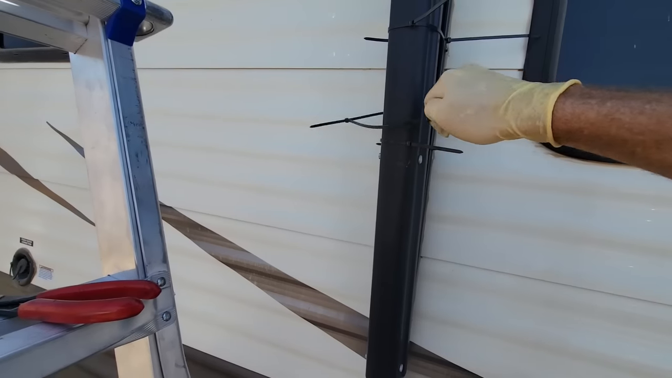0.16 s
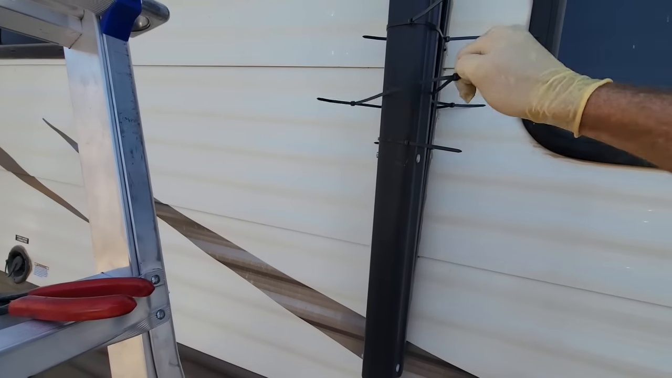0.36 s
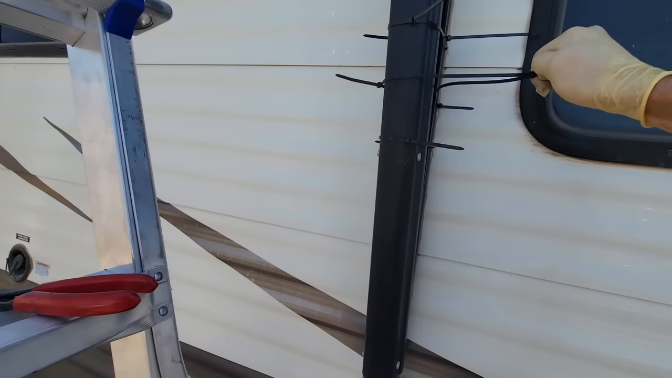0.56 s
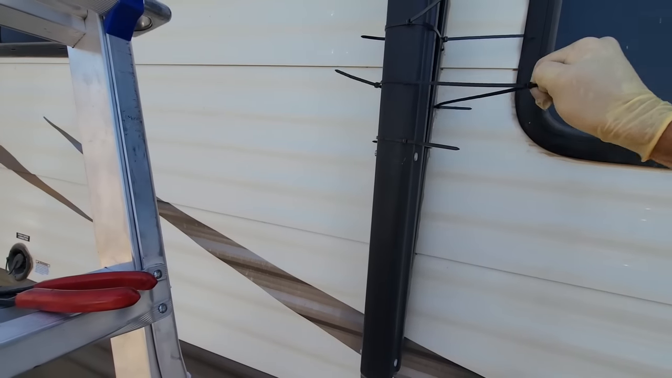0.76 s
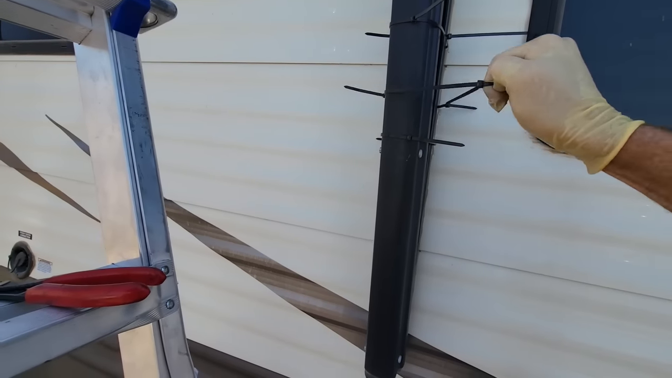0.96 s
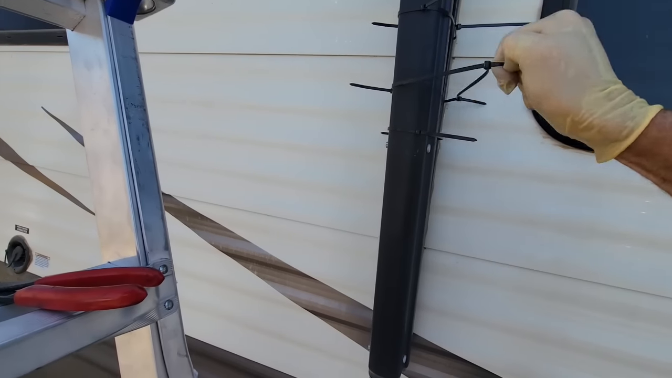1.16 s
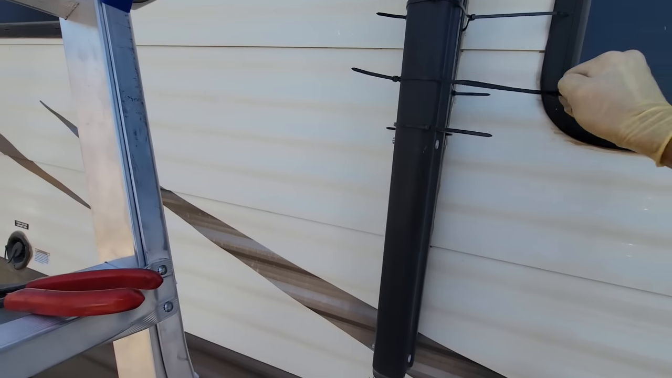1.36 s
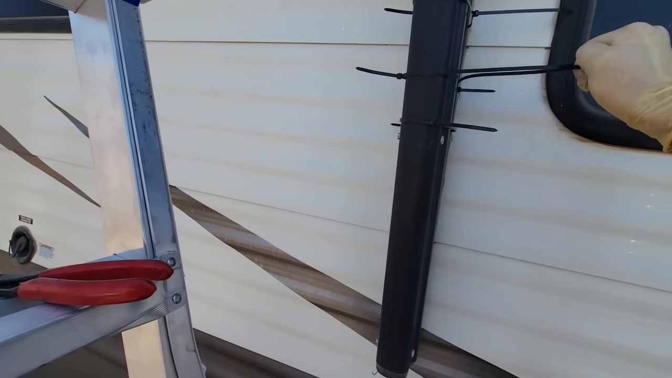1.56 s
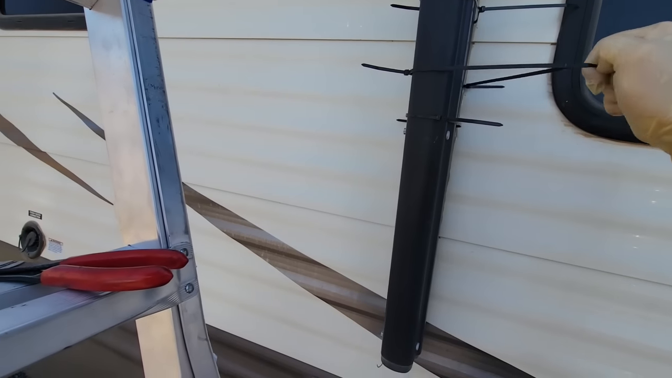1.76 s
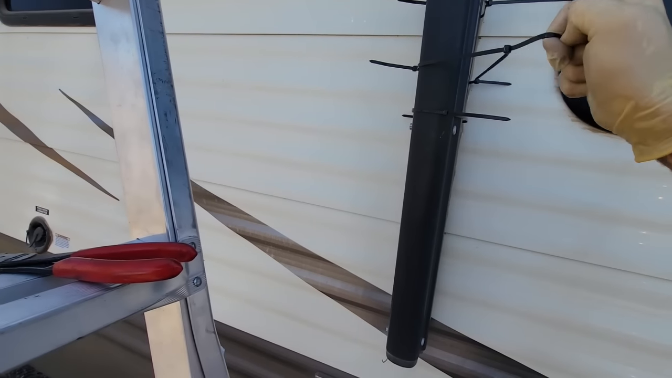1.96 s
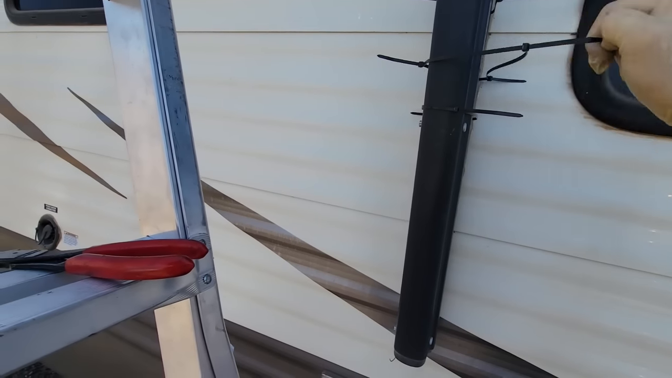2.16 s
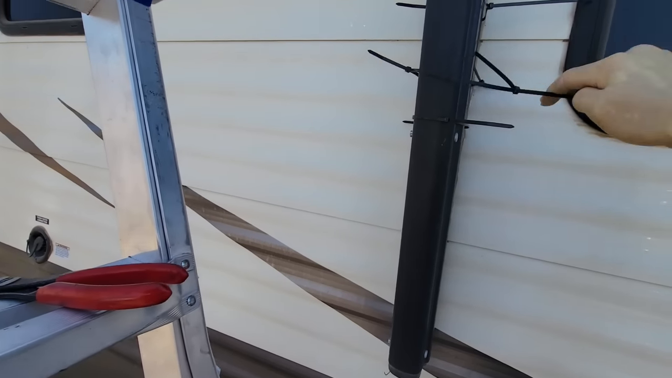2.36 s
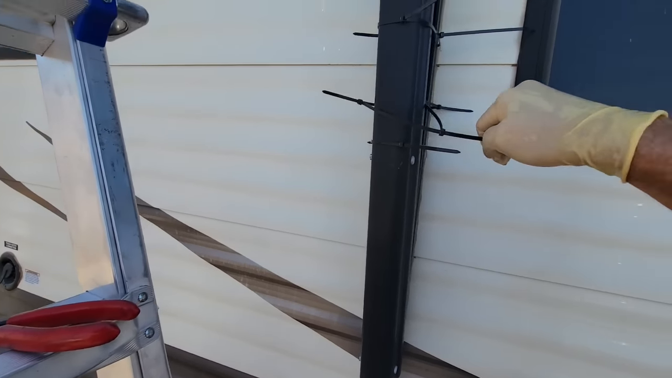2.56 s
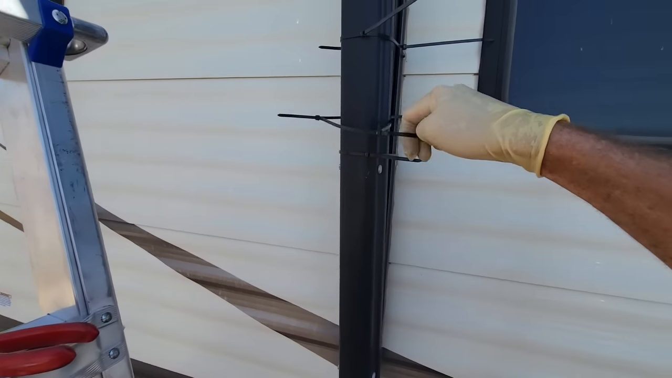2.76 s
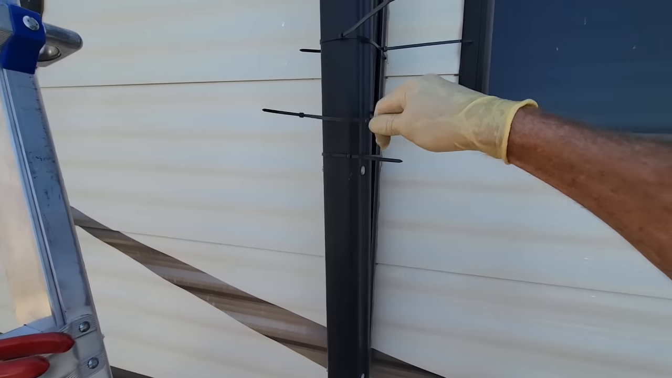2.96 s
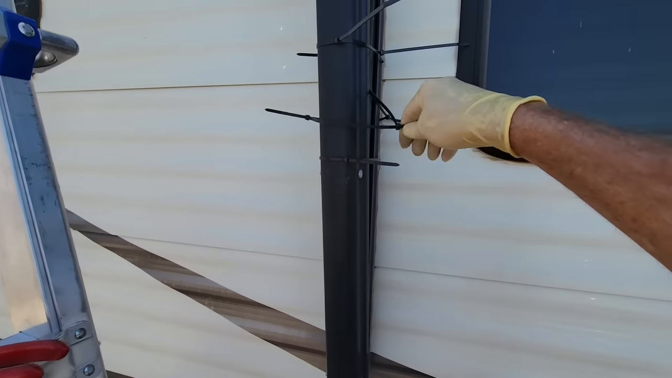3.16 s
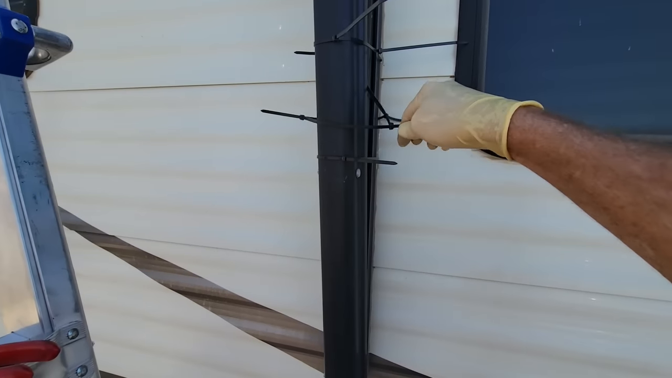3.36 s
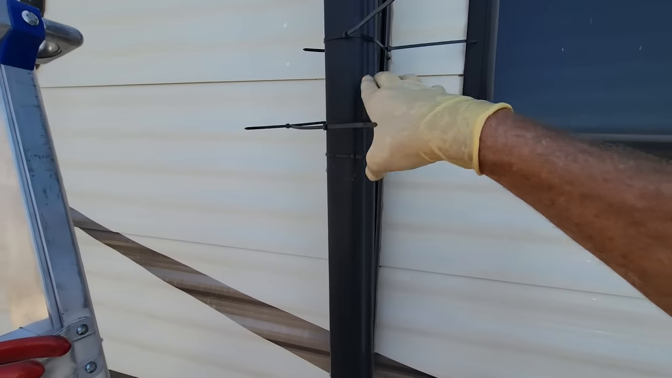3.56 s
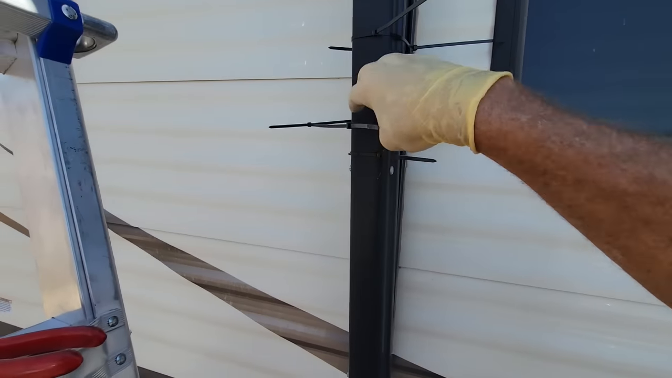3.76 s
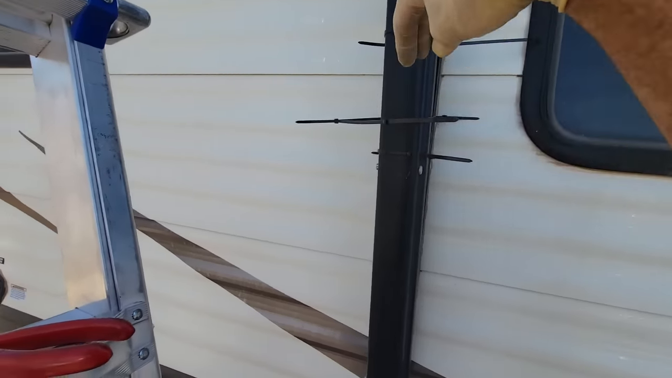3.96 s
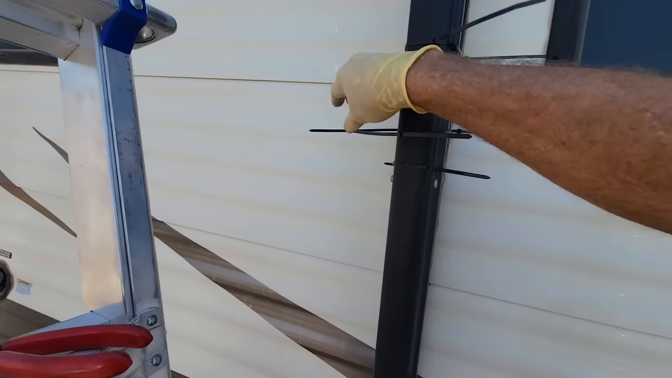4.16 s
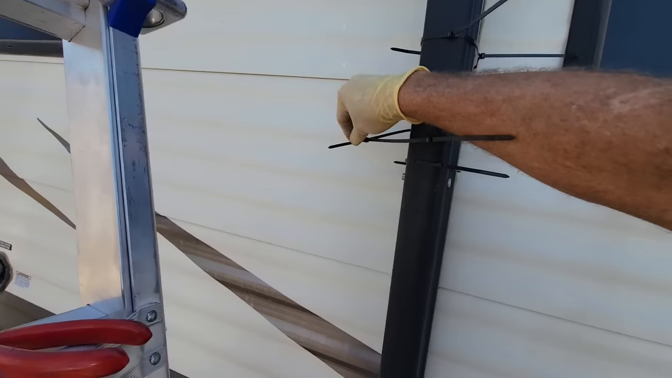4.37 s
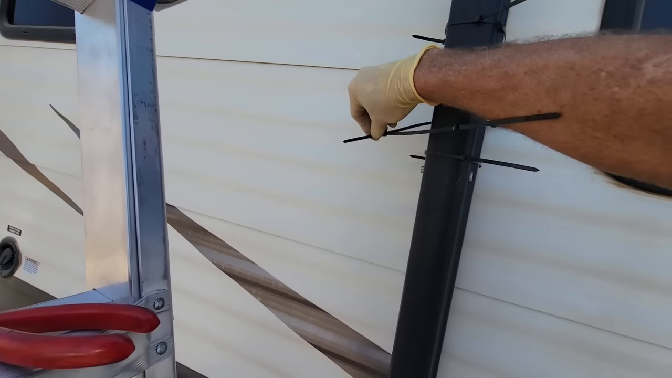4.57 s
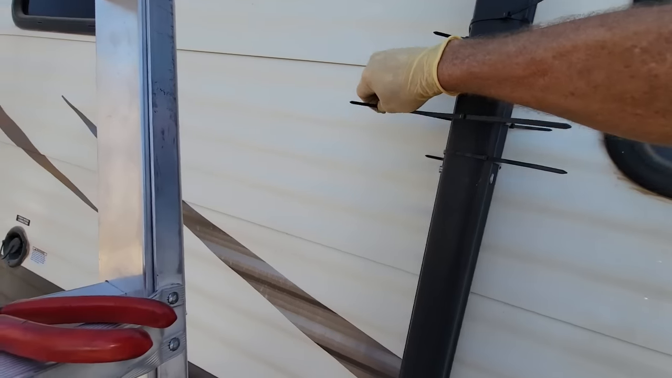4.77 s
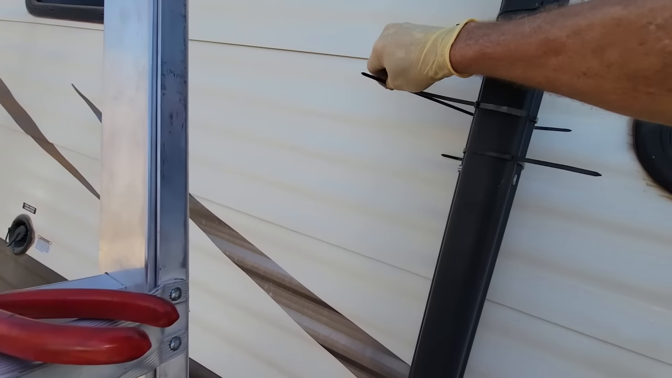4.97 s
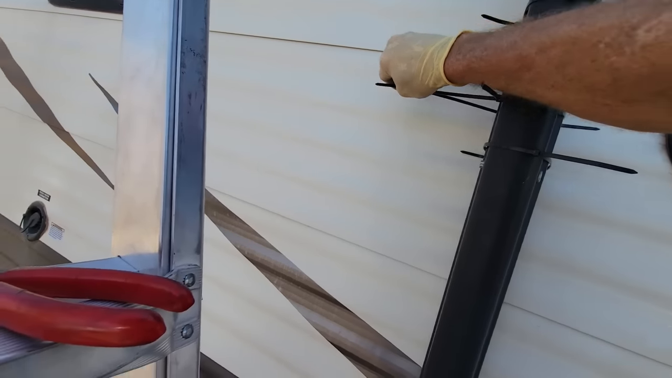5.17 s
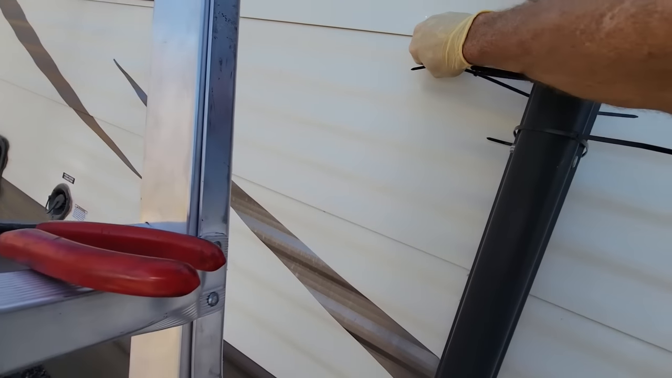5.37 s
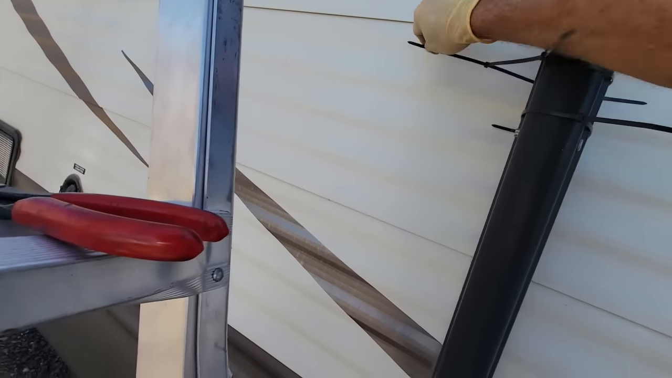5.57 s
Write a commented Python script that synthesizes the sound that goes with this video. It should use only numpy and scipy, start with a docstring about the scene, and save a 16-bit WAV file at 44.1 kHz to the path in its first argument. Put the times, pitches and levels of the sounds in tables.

```python
"""Outdoors, at a bar in front of a thin wall panel, on a stereo pair of microphones.
A gloved hand pulls nylon zip ties tight round the bar: glove and straps rub, the squeezed bar creaks,
and the pawl snaps over the teeth, singly and in two long runs, setting strap, bar and panel ringing.
Wind rumbles on the microphones over a distant hiss; far off, a small bird calls high and faint."""
import sys
import numpy as np
from scipy import signal
from scipy.fft import rfft, irfft, next_fast_len
from scipy.io import wavfile
from scipy.ndimage import uniform_filter1d

SR = 44100
rng = np.random.default_rng(int(sys.argv[2]) if len(sys.argv) > 2 else 0)


def generate_wav(signal):
    """Clip the signal to [-1, 1] and save it as 16-bit WAV at the path in sys.argv[1]."""
    frames = np.transpose(np.atleast_2d(signal))
    scaled = np.clip(frames, -1, 1) * 32767
    pcm = np.round(scaled).astype(np.int16)
    wavfile.write(sys.argv[1], SR, pcm)


N = 247821

# likeness of the two microphones: (frequency [Hz], likeness [0-1])
MIC_LIKENESS = [(60, 0.95), (150, 1), (500, 0.66), (1000, 0.59), (3000, 0.89), (6000, 0), (16000, 0.2)]
# phase of the left microphone ahead of the right: (frequency [Hz], phase [rad])
MIC_PHASE = [(0, 0), (300, -.35), (520, -1.4), (1500, -1.6), (2800, -1.9), (5000, -2.5), (6550, -14),
             (8350, -16), (10500, -16.5), (12100, -7.5), (14400, -12.5), (16700, -16.0)]
# left microphone over the right, before panning: (frequency [Hz], level [dB])
MIC_TILT = [(100, 0.5), (380, 4), (700, 1), (1300, 4), (2400, 5), (15000, 4)]
# lower edges of the panel, bar, strap and pawl bands: (frequency [Hz])
BAND_EDGES = [70, 450, 1500, 7000]
# spectrum of a click's dense ring: (frequency [Hz], level [dB])
RING_COLOUR = [(59, -50), (100, -25), (165, -21), (243, -4), (300, 0), (400, -9), (542, -3.5), (793, -7.5),
               (1090, -7.5), (1890, -19), (2640, -15), (3480, -14.5), (4390, -21.5), (8630, -24),
               (11000, -24), (13000, -17), (15600, -11)]
# decay of that ring: (frequency [Hz], t60 [s])
RING_DECAY = [(150, 0.27), (500, 0.093), (1200, 0.14), (3000, 0.15), (6000, 0.12), (10000, 0.14),
              (16000, 0.028)]
# modes of bar and panel: (frequency [Hz], level [dB], t60 [s])
BODY_MODES = [(110.6, -19, 0.2), (301, -5, 0.2), (360.4, -14.5, 0.27), (542.6, -8, 0.11), (700, -7, 0.13),
              (786, -22, 0.23), (921, -10.5, 0.12), (1100, -16, 0.13), (1370, -23, 0.28), (1659, -19, 0.12),
              (2010, -26, 0.2), (2330, -15, 0.086), (2650, -15.5, 0.059), (3125, -18.5, 0.17),
              (3520, -18, 0.06), (4333, -19.5, .1)]
# murmur as the hand shifts its hold: (time [s], panel level [dB])
HOLD_MURMUR = [(0.0, -70), (.45, -47.5), (1.2, -67), (1.74, -51), (1.87, -61), (2.05, -54.5), (2.4, -65.5),
               (2.8, -74.5), (3.2, -54.5), (3.45, -67), (3.85, -63), (4.1, -68), (4.6, -66.5), (5.15, -53),
               (5.3, -64.5), (5.62, -60.5)]
# strokes of glove and strap: (peak time [s], rise [s], fall [s], strap level [dB],
# panel over strap [dB], bar over strap [dB], top band over strap [dB])
GLOVE_STROKES = [(0.0, 0.049, 0.065, -45, -3, -43, -6), (0.178, 0.22, 0.013, -46.5, 6.5, 0.5, -4),
                 (.29, .03, 0.0087, -63, 11, 15, -24), (0.54, 0.058, 0.023, -46, 6, 10.5, -15),
                 (0.801, 0.047, .1, -67, 29, 23.5, -19), (.928, 0.12, 0.085, -50, -1, -18, -1.5),
                 (0.99, .1, 0.0093, -46.5, 17.5, 8.5, -23), (1.118, .03, 0.017, -57.5, 6, 14.5, -28),
                 (1.34, 0.29, 0.15, -56.5, 12, 8, -18), (1.64, 0.063, 0.078, -59, 14, 15, -26),
                 (1.687, 0.036, 0.017, -49, -4, -2, -8), (1.888, 0.016, 0.1, -51, -8, 2.5, -7),
                 (1.981, .1, 0.04, -54, -9, -10, -9), (2.243, 0.49, 0.15, -58, -19, -28, -6),
                 (2.43, 0.16, 0.037, -60.5, -8, -6, -16), (2.574, 0.13, 0.26, -65.5, -5, 0.5, -5),
                 (2.78, 0.3, 0.35, -62, 3, -1, -6), (2.93, 0.021, 0.15, -63.5, -12, 3.5, -25),
                 (3.087, 0.049, 0.04, -47, -15, -19, 2), (3.238, 0.097, .065, -49, 2.5, 1.5, -20),
                 (3.342, .03, 0.11, -69, 1, 1, -19), (3.63, 0.22, .02, -69, -6, -9, -20),
                 (3.72, 0.065, 0.08, -42, -6, 3, -12), (4.482, 0.069, 0.11, -63, 10, 9.5, -6),
                 (4.722, 0.076, 0.12, -58, -2, -2, 1), (5.2, .05, 0.047, -56.5, 14.5, 4.5, -3),
                 (5.401, 0.23, 0.025, -69, -5, 10, 0), (5.482, 0.031, 0.16, -66, -3, -9, -17)]
# gusts on the microphones: (time [s], level [dB])
GUSTS = [(0.0, -59), (0.33, -50), (0.59, -58), (0.66, -42), (0.7, -57), (1.53, -49.5), (1.58, -38),
         (1.67, -62), (1.74, -45.5), (2.14, -42.5), (2.21, -33), (2.28, -48), (2.38, -39), (2.43, -52),
         (2.55, -39.5), (2.63, -49.5), (3.74, -55.5), (3.94, -47.5), (4.04, -54.5), (5.62, -51)]
# spectrum of the wind: (frequency [Hz], level [dB])
RUMBLE_COLOUR = [(12, -37), (20, -9.5), (54, 2), (69, 7.5), (115, -8), (166, -63), (250, -10), (280, -27),
                 (300, -28), (390, -79), (660, -120)]
# spectrum of the distant hiss: (frequency [Hz], level [dB])
HISS_COLOUR = [(59, -14.5), (100, 3), (156, -5.5), (288, -17.5), (326, -5), (468, -30), (554, -10.5),
               (629, -17.5), (1020, -22), (1630, -30), (15600, -45)]
# creaks of the bar: (time [s], length [s], pitch [Hz], level [dB])
BAR_CREAKS = [(0.105, 0.076, 345, -45), (0.511, 0.072, 329, -36), (0.801, 0.042, 394, -45.5),
              (0.953, 0.041, 333, -53.5), (3.693, 0.093, 768, -38)]
# single snaps: (time [s], strap level [dB], panel over strap [dB], bar over strap [dB],
# pawl over strap [dB], twang pitch [Hz], twang over strap [dB])
SINGLE_SNAPS = [(0.2067, -35.5, -22, -2.5, -42, 3000, -12), (0.2652, -37, -2, -2, -33, 2960, -3.5),
                (0.3298, -49.5, 6.5, 5, -20, 2660, 3.5), (0.3571, -31, -23, 4, -3, 2210, -11),
                (0.3704, -33.5, 1.5, -4.5, -1, 3220, 1.5), (0.5049, -33.5, -5, 4.5, -4.5, 2200, -9.5),
                (.615, -33.5, -6, 8, -0.5, 2224, -6), (0.6425, -34.5, 2.5, 3, -2.5, 2290, -8),
                (0.6748, -36, .4, 11.5, 2, 2760, -4), (0.835, -49, -11, 5, -4, 2900, -30),
                (0.8931, -56, 19.5, 6, -2, 2240, 1), (0.9369, -38.5, 6, 5.5, -19, 2870, -18),
                (1.018, -30.5, -25, -1, -19, 2640, -14), (1.079, -35, 1.5, -1, -41, 2660, -7),
                (1.1909, -59.5, -9, 12.5, -22, 2670, 7), (1.3783, -32.5, 1, 5.5, -4, 2260, -7),
                (1.8886, -46, -25, 0.5, 1, 2980, -12), (1.943, -46.5, -6, -10, -20, 2820, -6),
                (1.9713, -46, -23, -17, -16, 2950, -14), (2.161, -56, -6, -21, -8, 4700, 4),
                (2.4371, -54.5, 7.5, 0, -22, 2260, -5), (2.4582, -46.5, 1, 0.5, -16, 3300, 1),
                (2.576, -53.5, 2.2, -9, -11, 3400, -1), (2.7682, -56.5, -19, -25, -14, 4200, 1),
                (2.9064, -46.5, -13, -8, -25, 3620, -3), (3.149, -49, -3, -5, -19, 3220, -15),
                (3.1919, -44.5, -23, -13, -24, 3240, -1), (3.2232, -39, -22, -29, -17, 3380, -3),
                (3.3404, -58.5, -4, -25, -14, 3320, -1), (3.4578, -63.5, 3, 1.5, -20, 3300, -1),
                (3.6463, -44.5, 2.5, -11, -19, 3700, -0.5), (3.683, -37, -18, -9, -19, 5460, -9),
                (3.6918, -36, -23, 0, -19, 2140, -13), (3.7105, -38.5, -3.5, -7, -10, 2183, -2.5),
                (4.6964, -52.5, 1, -6, -2, 4080, 5), (4.7569, -28, -10.5, -4, 5, 3590, -8),
                (4.8148, -40.5, -1.5, -23, -1, 3500, 9), (5.069, -41, -5, -3.5, 8.5, 3300, -20),
                (5.205, -54, 9.5, -13, -17, 4340, 8.5), (5.2991, -56.5, -12, 7.5, -16, 4230, 8),
                (5.3868, -55, -8, -9, -2, 4190, 9), (5.479, -51.5, -15, -9.5, -11, 3660, -2),
                (5.561, -60.5, -1, 7, -4, 4350, 4)]
# added to a single snap's clicks, a row each for panel, bar, strap and pawl: (gain [dB])
SNAP_BOOST = [
    [26.5],
    [23.5],
    [23.5],
    [22.5],
]
# spectrum of the pawl's bare tick: (frequency [Hz], level [dB])
TICK_COLOUR = [(8000, -38), (11000, -20), (13500, -6), (15500, 0)]
# long pulls, a curve each: (time [s], rate [teeth/s], strap level [dB],
# panel over strap [dB], bar over strap [dB])
LONG_PULLS = [
    [(1.378, 244.1, -33, 2, 7.5), (1.43, 339.9, -27, 0.5, -2), (1.455, 335.2, -31.5, 3, -5),
     (1.475, 238.3, -28.5, -1.2, -5), (1.5, 363, -27.5, -3, -5), (1.515, 215.5, -28.5, -7, -6),
     (1.54, 220, -30, 3.5, -3.5), (1.58, 156.4, -30, -9, -1.5), (1.6, 135, -60.5, -12, 20)],
    [(4.76, 126.6, -37, -7, 0), (4.79, 162.9, -32.5, -11, 3), (4.83, 203.2, -37, 2, 4),
     (4.88, 157, -37.5, -9, 5), (4.915, 177.5, -36, -8, 6.5), (4.99, 198.9, -38, 3.5, 6.5),
     (5.02, 172.1, -36, -2, -1.5), (5.05, 128, -43, -2, 0.5), (5.075, 69.8, -47.5, 8, 9)],
]
# brightness and position of each pull: (pawl over strap [dB], left over right [dB])
PULL_BALANCE = [(-5.5, -6), (0, -7.5)]
# distant bird: (time [s], length [s], first pitch [Hz], last pitch [Hz], level [dB])
BIRD_CALLS = [(2.94, 0.077, 9200, 8800, -69), (4.059, 0.072, 9000, 8900, -71.5),
              (4.643, 0.076, 8700, 8600, -67), (5.542, 0.05, 8960, 8440, -68)]

SNAP_PAN_DB = -6.5  # left over right
RING_SAMPLES = 12000


def gain_of(db):
    """Decibels to gain."""
    return 10 ** (np.asarray(db) / 20)


def unit_rms(x):
    """Scales to rms 1."""
    return x / np.sqrt(np.mean(x ** 2) + 1e-20)


def at_hz(points, hz):
    """Reads a table on a log frequency axis."""
    f, value = np.transpose(points)
    return np.interp(np.log(hz + 1), np.log(f + 1), value)


def follow(rows, t):
    """The columns of a curve at times t."""
    times, *columns = np.transpose(rows)
    return np.array([np.interp(t, times, c) for c in columns])


def mic_pair(z, other, hz):
    """Spectra at the two microphones: partly alike, the left one late."""
    same = np.clip(at_hz(MIC_LIKENESS, hz), 0, 1)
    late = np.exp(1j * np.interp(hz, *np.transpose(MIC_PHASE)))
    tilt = gain_of(at_hz(MIC_TILT, hz) / 2)
    return np.array([tilt * late * z, (same * z + np.sqrt(1 - same ** 2) * other) / tilt])


def noise_spectra(colour, length, size):
    """Random short-time spectra at both microphones, with their frequencies and times."""
    hz = np.fft.rfftfreq(size, 1 / SR)[:, None]
    t = np.arange(4 * length // size + 5) * size / 4 / SR
    a, b, c, d = rng.standard_normal((len(t), len(hz), 4)).T
    return mic_pair(a + 1j * b, c + 1j * d, hz) * gain_of(at_hz(colour, hz)), hz, t


def to_wave(z, length, size):
    """Short-time spectra to sound."""
    return signal.istft(z, nperseg=size, noverlap=3 * size // 4)[1][:, :length]


def band_gains(strap_db, panel_db, bar_db, pawl_db):
    """Gains of panel, bar, strap and pawl; the other three are given over the strap."""
    return gain_of([strap_db + panel_db, strap_db + bar_db, strap_db, strap_db + pawl_db])


def joined(*trains):
    """Merges click trains, each (sample positions, band gains, left over right in dB)."""
    return [np.concatenate(c, axis=-1) for c in zip(*trains)]


def rubbing(per_s=700, spread_db=4.0, pan_db=-6.0, fade_db=20):
    """Glove and strap slip in dense tiny clicks, swelling with each stroke over the murmur of the hold."""
    at = np.flatnonzero(rng.random(N) < per_s / SR)
    t = at / SR
    slip = gain_of(spread_db * np.minimum(rng.exponential(1, N), 5)) * rng.choice([-1, 1], N)
    slip /= np.sqrt(np.mean(slip ** 2) * per_s / SR)
    hold_bands = gain_of([[0], [-8], [-13.5], [-35]])  # panel, bar, strap, top band
    power = (gain_of(follow(HOLD_MURMUR, t)) * hold_bands) ** 2
    for peak, rise, fall, strap_db, *over_db in GLOVE_STROKES:
        away = np.maximum((peak - t) / rise, (t - peak) / fall)
        power += band_gains(strap_db - fade_db * away, *over_db) ** 2
    return at, np.sqrt(power) * slip[at], np.full(len(at), pan_db)


def struck_spot(size):
    """Spectrum of what one click sets off: a crack, a dense dying ring and the modes of bar and panel."""
    t = np.arange(RING_SAMPLES) / SR
    z, hz, frame_s = noise_spectra(RING_COLOUR, len(t), size=256)
    decay = gain_of(-60 * frame_s / at_hz(RING_DECAY, hz))
    dense = unit_rms(to_wave(z * decay, len(t), size=256))
    dense *= np.minimum(t / 0.00051, 1) * (1 + 0.7 * np.exp(-t / 0.0045))  # the opening crack
    spot_db = 4 * rng.standard_normal(len(BODY_MODES))  # each spot excites the modes differently
    modes = np.zeros((2, len(t)))
    for side in modes:
        for (f, db, t60), extra_db in zip(BODY_MODES, spot_db):
            side += gain_of(db + extra_db - 60 * t / t60) * np.sin(2 * np.pi * (f * t + rng.random()))
    return rfft(dense, size) + 4.1 * mic_pair(*rfft(modes, size), np.fft.rfftfreq(size, 1 / SR))


def bar_and_panel(at, level, pan_db, spots=4, dwell_samples=2600):
    """Clicks ring through bar and panel in four bands; the struck spot moves now and then."""
    size = next_fast_len(N + RING_SAMPLES)
    hz = np.fft.rfftfreq(size, 1 / SR)
    lowpasses = [1 / (1 + (hz / edge) ** 6) for edge in BAND_EDGES]
    bands = np.diff(lowpasses + [np.ones_like(hz)], axis=0)
    spot = rng.integers(0, spots, N // dwell_samples + 1)[at // dwell_samples]
    out = np.zeros((2, len(hz)), complex)
    for k in range(spots):
        body = struck_spot(size)
        energy = 2 * (abs(body.mean(0)) ** 2 * bands ** 2).sum(1) / size
        for side, sign in enumerate((1, -1)):
            gains = (level * gain_of(sign * pan_db / 2))[:, spot == k] / np.sqrt(energy)[:, None]
            clicks = np.array([np.bincount(at[spot == k], g, N) for g in gains])
            out[side] += (rfft(clicks, size) * bands).sum(0) * body[side]
    return irfft(out, size)[:, :N]


def wind(same=0.58):
    """Low lumpy pressure, partly its own at each microphone and stronger on the right."""
    z = noise_spectra(RUMBLE_COLOUR + [(600, -84.0)], N, size=2048)[0]
    left, right = unit_rms(to_wave(z, N, size=2048))
    right = same * right + np.sqrt(1 - same ** 2) * right[::-1]
    gusts = gain_of(follow(GUSTS, np.arange(N) / SR))
    return gusts * np.array([left, right]) * gain_of([[-1.5], [3.]])


def distant_hiss(level_db=-58, patchy_db=.7):
    """Outdoor wash from far off, nearly steady, stronger on the right."""
    z = noise_spectra(HISS_COLOUR, N, size=1024)[0]
    patches = uniform_filter1d(rng.standard_normal(z.shape[1:]), 12, axis=0)
    patches = unit_rms(uniform_filter1d(patches, 14, axis=1))
    wash = unit_rms(to_wave(z * gain_of(patchy_db * patches), N, size=1024))
    return wash * gain_of(level_db) * gain_of([[-.3], [3.5]])


def creaks(waver_hz=17.16):
    """The squeezed bar sticks and slips at a wavering pitch, swelling and fading."""
    out = np.zeros((2, N))
    for start, length, hz, db in BAR_CREAKS:
        size = 2 * round(length * SR / 2)
        wobble = unit_rms(uniform_filter1d(rng.standard_normal(8000), size=500))[:size]
        turns = np.cumsum(hz + waver_hz * wobble) / SR
        tone = rfft(gain_of(db) * np.sin(2 * np.pi * turns) * np.hanning(size) ** .5)
        stereo = irfft(mic_pair(tone, tone, np.fft.rfftfreq(size, 1 / SR)))
        out[:, round(start * SR):][:, :size] += stereo * gain_of([[-2], [2]])
    return out


def snaps(clicks=6, slip_s=0.0037):
    """Each snap is one click and a few weaker ones as the strap slips and settles."""
    start, strap_db, panel_db, bar_db, pawl_db = np.transpose(SINGLE_SNAPS)[:5]
    settling = np.arange(clicks) > 0
    late = rng.random((len(start), clicks)) * 2 * settling
    share = np.exp(-late) * np.where(settling, .6, 1)
    share /= np.linalg.norm(share, axis=1, keepdims=True)
    level = band_gains(strap_db, panel_db, bar_db, pawl_db) * gain_of(SNAP_BOOST)
    at = np.round((start[:, None] + late * slip_s) * SR).astype(int)
    return at.ravel(), (level[:, :, None] * share).reshape(4, -1), np.full(at.size, SNAP_PAN_DB)


def pawl_ticks(at, level, pan_db, tick_db=8, fall_s=.0016, variants=4):
    """The pawl gives a very short bright tick as it drops behind a tooth."""
    out = np.zeros((2, N))
    variant = rng.integers(0, variants, N)[at]
    for k in range(variants):
        z = noise_spectra([(4000, -69)] + TICK_COLOUR, 600, size=128)[0]
        tick = to_wave(z, 600, size=128) * np.exp(-np.arange(600) / SR / fall_s)
        tick *= gain_of(tick_db) / np.linalg.norm(tick.mean(0))
        for side, sign in enumerate((1, -1)):
            clicks = np.bincount(at, level[3] * gain_of(sign * pan_db / 2) * (variant == k), N)
            out[side] += signal.oaconvolve(clicks, tick[side])[:N]
    return out


def strap_twangs(mode_ratio=1.04):
    """The snapped strap rings in two close bending modes, pitched by grip and tension."""
    out = np.zeros((2, N + RING_SAMPLES))
    t = np.arange(RING_SAMPLES) / SR
    hz = np.fft.rfftfreq(RING_SAMPLES, 1 / SR)
    pan = gain_of([[SNAP_PAN_DB / 2], [-SNAP_PAN_DB / 2]])
    for start, strap_db, *_, pitch, twang_db in SINGLE_SNAPS:
        modes = np.sin(2 * np.pi * pitch * t) + 0.9 * np.sin(2 * np.pi * mode_ratio * pitch * t)
        t60 = 0.24 * (2200 / pitch) ** 2.3  # higher notes die sooner
        ring = rfft(gain_of(strap_db + twang_db - 60 * t / t60) * modes)
        out[:, round(start * SR):][:, :RING_SAMPLES] += irfft(mic_pair(ring, ring, hz)) * pan
    return out[:, :N]


def pulls(spread_db=0.5):
    """Two long runs, one click a tooth at the pace of the hand; each steadies as it goes."""
    trains = []
    for rows, (pawl_db, pan_db) in zip(LONG_PULLS, PULL_BALANCE):
        t = np.arange(rows[0][0], rows[-1][0], 1 / SR)
        rate, *db = follow(rows, t)
        scatter = np.linspace(.45, .05, len(t))  # in tooth spacings
        tooth = np.flatnonzero(np.diff(np.floor(np.cumsum(rate) / SR)))
        jitter, force = rng.standard_normal((len(tooth), 2)).T
        times = t[tooth] + jitter * scatter[tooth] / rate[tooth]
        level = band_gains(*np.array(db)[:, tooth], pawl_db) * gain_of(spread_db * force)
        level *= np.sqrt(SR / rate[tooth])  # keeps the power independent of the pace
        trains.append((np.round(times * SR).astype(int), level, np.full(len(tooth), pan_db)))
    return trains


def bird():
    """Thin falling whistles, far off and a little to the left."""
    out = np.zeros(N + SR)
    for start, length, first_hz, last_hz, db in BIRD_CALLS:
        hz = np.linspace(first_hz, last_hz, round(length * SR))
        tone = np.sin(2 * np.pi * np.cumsum(hz) / SR) * signal.windows.tukey(len(hz), .4)
        out[round(start * SR):][:len(hz)] += gain_of(db) * tone
    return out[:N] * gain_of([[0.], [-3.]])


def scene():
    """The ties on the bar, with wind on the microphones and hiss and bird in the distance."""
    teeth = joined(*pulls(), snaps())
    ties = bar_and_panel(*joined(teeth, rubbing())) + pawl_ticks(*teeth) + strap_twangs() + creaks()
    return ties + wind() + distant_hiss() + bird()


def record(dry):
    """The recorder passes nothing above its band limit."""
    lowpass = signal.firwin(801, cutoff=15750, window=("kaiser", 9), fs=SR)
    return signal.oaconvolve(dry, lowpass[None], "same")


dry = scene()
out = record(dry)
generate_wav(out)
```